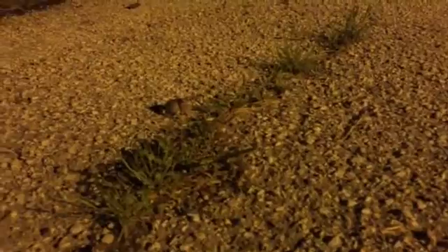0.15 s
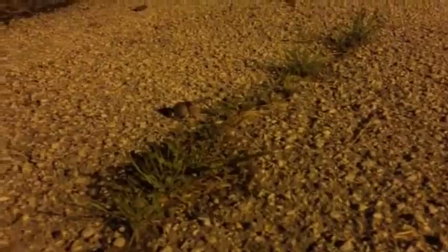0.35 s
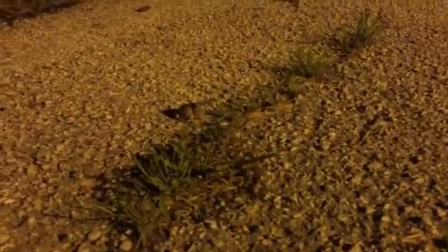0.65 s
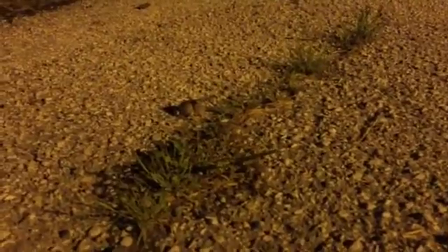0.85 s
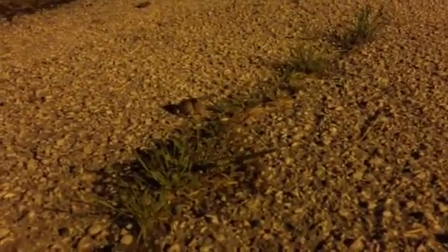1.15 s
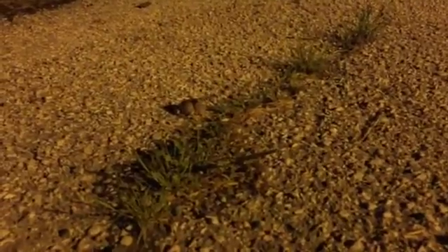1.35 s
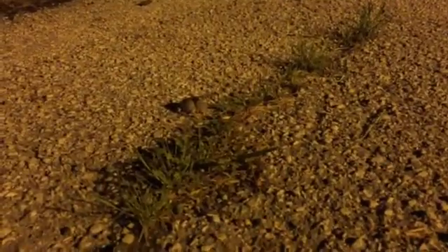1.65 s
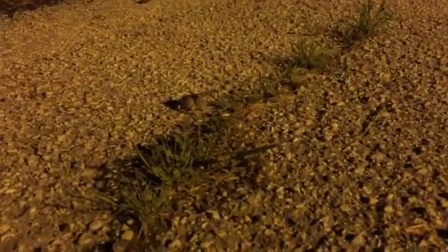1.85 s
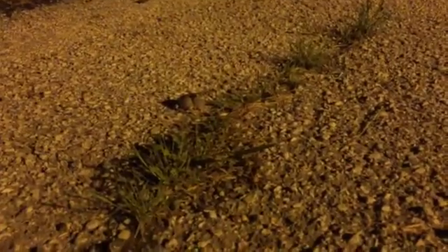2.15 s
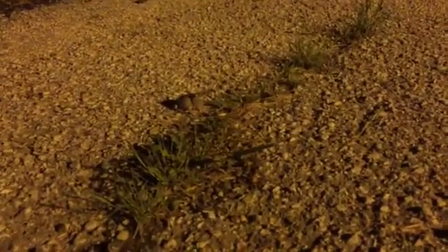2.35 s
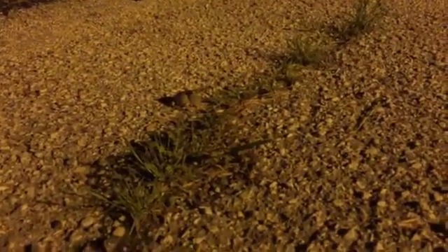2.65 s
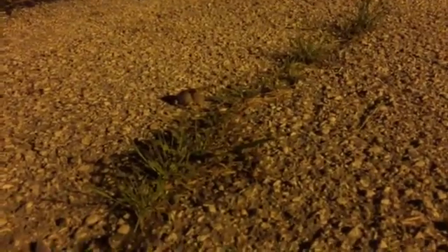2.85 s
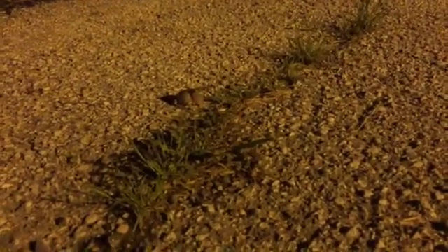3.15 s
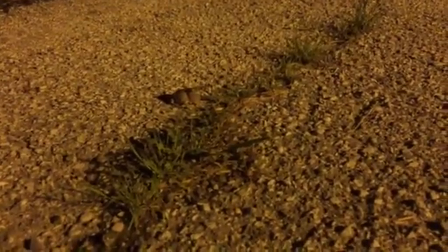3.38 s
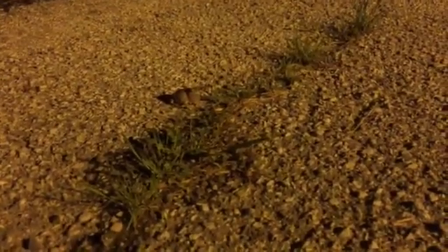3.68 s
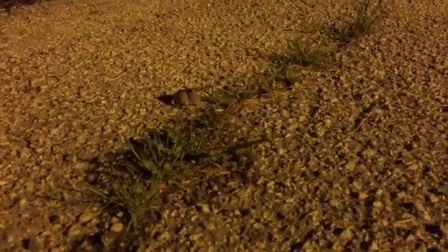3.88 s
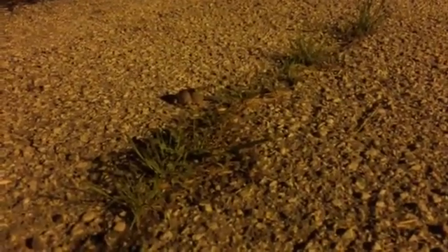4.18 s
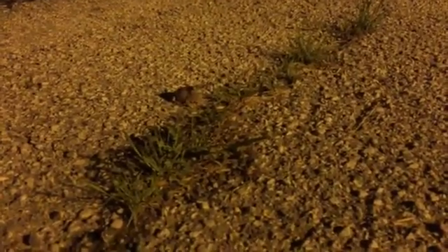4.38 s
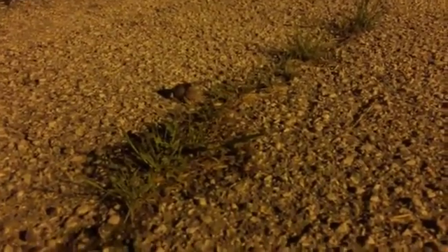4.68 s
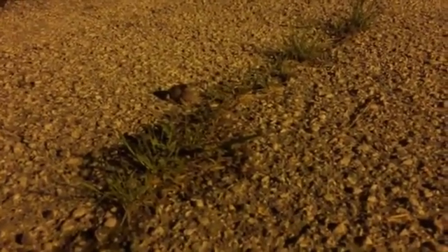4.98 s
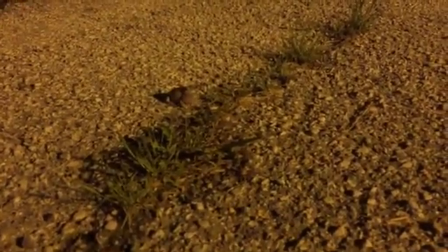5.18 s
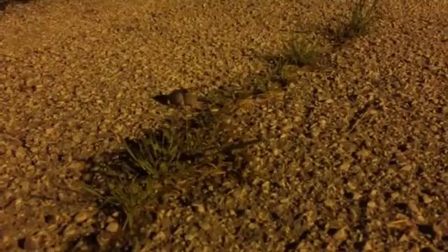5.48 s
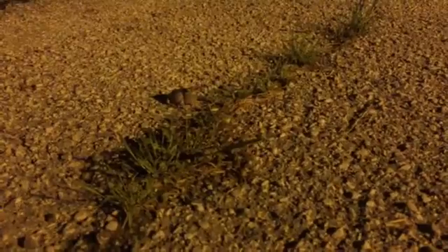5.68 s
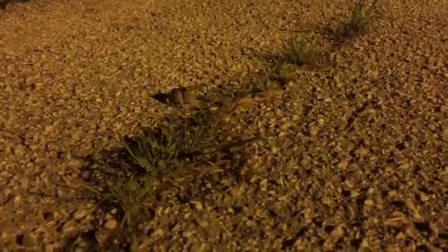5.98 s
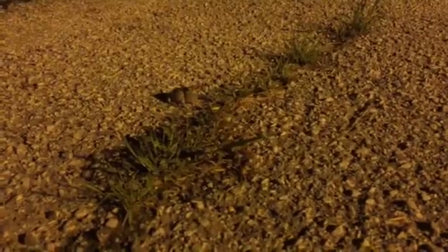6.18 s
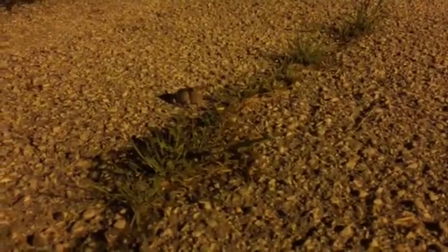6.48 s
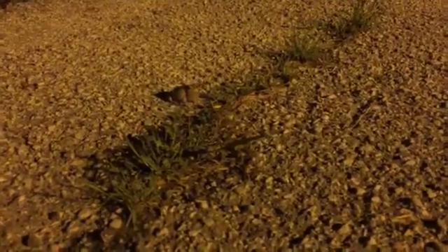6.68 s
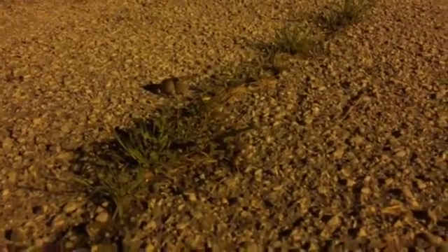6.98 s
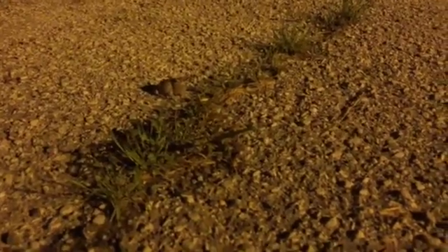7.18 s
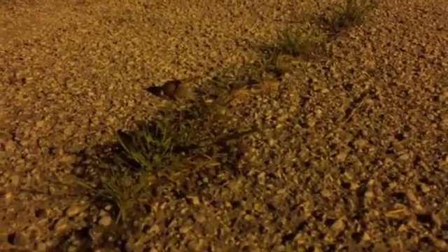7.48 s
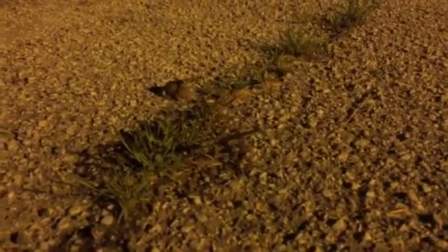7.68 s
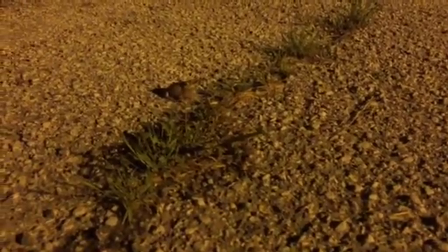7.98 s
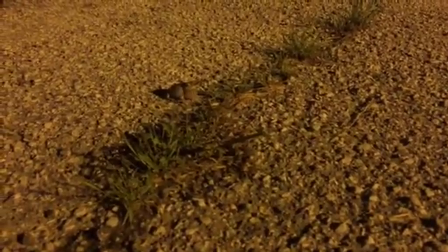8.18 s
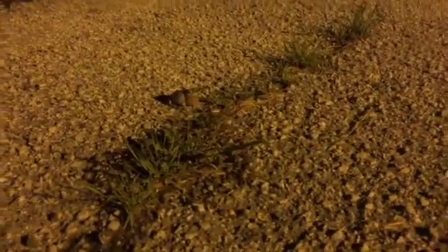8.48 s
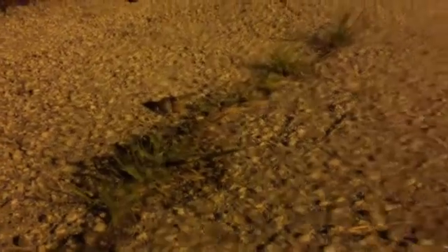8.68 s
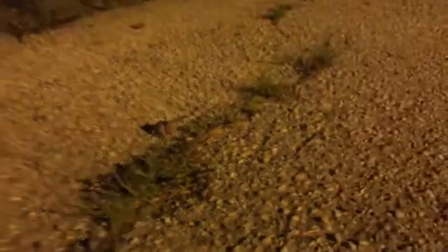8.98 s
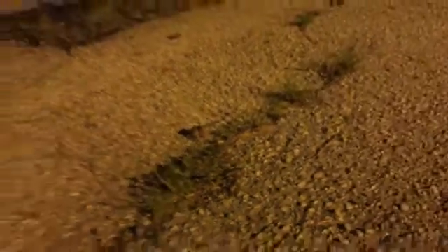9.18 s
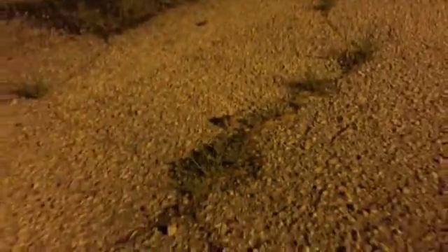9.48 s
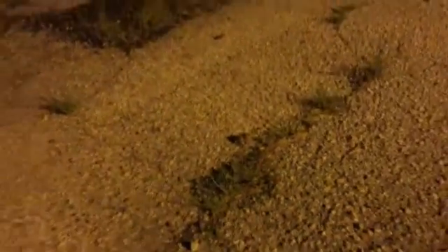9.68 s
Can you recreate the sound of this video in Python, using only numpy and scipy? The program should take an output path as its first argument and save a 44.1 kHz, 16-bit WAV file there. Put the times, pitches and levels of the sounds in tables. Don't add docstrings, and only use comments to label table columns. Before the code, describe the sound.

Quiet night lane with steady low hum, distant trilling frogs, a soft toad purr and small dry clicks. One frog very near the microphone winds up from hoarse, low pulses into a piercing train of upward whistles, pauses about two seconds, then repeats more briefly. Background ducks under each trill and creeps back. Faint truck and brake squeal between them; clicks thicken and a tiny tick comes near the end.

```python
import sys
import numpy as np
from scipy import signal
from scipy.fft import rfft, irfft, next_fast_len
from scipy.io import wavfile
from scipy.ndimage import uniform_filter1d

SR = 44100
rng = np.random.default_rng(int(sys.argv[2]) if len(sys.argv) > 2 else 0)


def amp(db):
    return 10 ** (np.asarray(db, float) / 20)


def write(x):
    x = np.atleast_2d(x).T
    wavfile.write(sys.argv[1], SR, np.round(np.clip(x, -1, 1) * 32767).astype(np.int16))


N = 433944
T = np.arange(N) / SR


def rms_one(x):
    return x / np.sqrt(np.mean(x ** 2) + 1e-20)


def in_time(rows):
    s, *columns = np.transpose(rows)
    return [np.interp(T, s, column) for column in columns]


def at_hz(points, hz):
    curve_hz, curve_db = np.transpose(points)
    return np.interp(np.log(hz), np.log(curve_hz), curve_db)


def band(x, low_hz, high_hz, order=2):
    return signal.sosfilt(signal.butter(order, [low_hz, high_hz], "band", fs=SR, output="sos"), x)


def noise_band(low_hz, high_hz, order=2):
    return rms_one(band(rng.standard_normal(N), low_hz, high_hz, order))


def drift(rate_hz):
    r = np.exp(-80 * np.pi * rate_hz / SR)
    slow = signal.lfilter([1], [1, -2 * r, r * r], rng.standard_normal(N // 40 + 1001))[1000:]
    return np.repeat(rms_one(slow - slow.mean()), 40)[:N]


def ring(x, hz, t60_s):
    r = amp(-60 / (t60_s * SR))
    gain = (1 - r * r) / 2
    return signal.lfilter([gain, 0, -gain], [1, -2 * r * np.cos(2 * np.pi * hz / SR), r * r], x + 1e-18)


def tone(hz, db):
    return np.sqrt(2) * amp(db) * np.sin(2 * np.pi * np.cumsum(hz) / SR)


def scatter(x, *tails):
    t = np.arange(SR // 2) / SR
    echoes = 0
    for db, t60_s, gap_s in tails:
        tail = rng.standard_normal(len(t)) * amp(-60 * t / t60_s) * (t > gap_s)
        echoes = echoes + amp(db) * tail / np.sqrt(np.sum(tail ** 2))
    return x + signal.fftconvolve(x, echoes)[:N]


# frequency in Hz, density in dB per Hz.
NIGHT_SPECTRUM = [(25, -39.5), (55, -12), (125, -9.5), (260, -13.5), (400, -15), (470, -20), (800, -21),
                  (1600, -27.5), (2600, -27.5), (2950, -40.5), (4200, -48.5), (7000, -54.5), (11000, -62),
                  (15500, -67.5)]


def night_air():
    size = next_fast_len(N)
    hz = np.maximum(np.fft.rfftfreq(size, 1 / SR), 1)
    rumble_cut = np.minimum(hz / 25, 1) ** 2
    air = irfft(rfft(rng.standard_normal(size)) * amp(at_hz(NIGHT_SPECTRUM, hz)) * rumble_cut, size)[:N]
    return amp(-42 + 0.31 * drift(2.2)) * rms_one(air)


# frequency in Hz, level in dB, wander in Hz.
DRONE_TONES = [(75.9, -41, 1), (152, -51, 2), (234.6, -48, 3.87), (295.4, -52, 6), (342.6, -48, 1.9),
               (351.5, -59.5, 2.24), (378, -50.5, 2.25), (415, -55.5, 1.86), (535, -66, 2.2),
               (669, -61.5, 1.83)]
# time in seconds, level change in dB.
LOW_DRONE_FADE = [
    (0, 0),
    (4.4, 0),
    (7, -2),
    (8.7, -6),
    (9.84, -7.5),
]
# time in seconds, pitch in Hz, level in dB.
FAR_ENGINE = [
    (0, 96.5, -44),
    (.6, 96.8, -37),
    (1.0, 96.2, -41.5),
    (2.0, 98.2, -54),
    (3.5, 94.7, -49),
    (4.5, 92.2, -66),
]
# time in seconds, pitch in Hz, level in dB.
PASSING_TRUCK = [
    (5.93, 181, -65),
    (5.99, 181.4, -35),
    (6.1, 169.6, -39.5),
    (6.17, 168.3, -34.5),
    (6.31, 159, -42.5),
    (6.4, 157.6, -43),
    (6.55, 156, -53),
    (6.62, 151.5, -65),
]
# time in seconds, pitch in Hz, level in dB.
BRAKE_SQUEAL = [
    (6.04, 8900, -100),
    (6.1, 8900, -82),
    (6.17, 8850, -76),
    (6.3, 9000, -86),
    (6.38, 9000, -100),
]


def machines():
    fade_db, = in_time(LOW_DRONE_FADE)
    out = np.zeros(N)
    for hz, db, wander_hz in DRONE_TONES:
        out += tone(hz + wander_hz * drift(8), db + 1.43 * drift(5.0) + fade_db * (hz < 100))
    for rows, wander_hz in ((FAR_ENGINE, 1.5), (PASSING_TRUCK, 1.2), (BRAKE_SQUEAL, 60)):
        hz, db = in_time(rows)
        present = (T > rows[0][0]) * (T < rows[-1][0])
        out += tone(hz + wander_hz * drift(18), db + 0.45 * drift(16)) * present
    return out


# milliseconds from closing, pitch in Hz, level in dB.
WHISTLE_SHAPE = [
    (-25, 890, -70),
    (-22, 935, -32),
    (-18, 1000, -20),
    (-13, 1070, -10),
    (-6, 1145, 0),
    (-2, 1212, -1),
    (.3, 1285, -9.5),
    (2.2, 1400, -27),
    (4, 1450, -70),
]
# frequency in Hz, gain in dB.
SAC_COLOUR = [(880, 8.5), (1080, -12), (1180, -15), (1290, -5), (1450, 2.5), (2600, 0), (3100, -34),
              (3700, -25), (4300, -50), (4800, -34.5), (5300, -58), (5900, -30), (6500, -38), (7000, -29),
              (8000, -47.5), (15500, -55)]


def whistles(close_s, peak_db, fundamental_db, length_ms, pitch, count):
    usual_ms, usual_fundamental_db = 12.21, -12
    balance_db = (fundamental_db - usual_fundamental_db)[:, None]
    k = np.arange(-1150, 170)
    stretch = np.where(k < 0, (usual_ms / length_ms[:, None]) ** 0.66, 1)
    ms = k / SR * 1000 * stretch
    shape_ms, shape_hz, shape_db = np.transpose(WHISTLE_SHAPE)
    hz = np.interp(ms, shape_ms, shape_hz) * pitch[:, None]
    db = np.interp(ms, shape_ms, shape_db, left=-120, right=-120)
    shake = signal.lfilter([.03], [1, -.97], rng.standard_normal(hz.shape))
    unsteady_hz = hz * (1 + .04 * shake)
    phase = 2 * np.pi * (np.cumsum(unsteady_hz, axis=1) / SR + rng.random((len(hz), 1)))
    wave = amp(db + at_hz(SAC_COLOUR, hz) + balance_db) * np.sin(phase)
    for n in range(2, count + 1):
        effort_db = 0
        if n > 2:
            effort_db = 2.0 + 0.32 * db + 0.15 * np.minimum(peak_db, 0)[:, None]
        if n == 3:
            effort_db = effort_db + 0.3 * balance_db
        wave += amp(db + effort_db + at_hz(SAC_COLOUR, n * hz)) * np.sin(n * phase)
    wave *= amp(peak_db)[:, None]
    at = np.clip(np.round(close_s * SR).astype(int)[:, None] + k, 0, N)
    return np.bincount(at.ravel(), wave.ravel(), minlength=N + 1)[:N]


# time in seconds, level in dB, centre pitch in Hz.
CHORUS_SWELL = [(0.1, -40.5, 2217), (0.45, -41.8, 2236), (1.0, -39.5, 2252), (1.45, -43, 2275),
                (2.15, -40.5, 2308), (2.7, -44, 2335), (3.0, -38, 2252), (3.4, -40.5, 2234),
                (3.65, -43, 2257), (4.0, -44.5, 2225), (4.2, -37.5, 2230), (5.6, -42, 2295),
                (6.6, -39.5, 2278), (7.2, -39, 2240), (8.2, -42.5, 2237), (8.65, -38.5, 2253),
                (9.2, -44.5, 2250), (9.7, -37, 2277)]


def chorus():
    db, centre_hz = in_time(CHORUS_SWELL)
    own = rng.random((8, 4))
    per_s = 21.5 + 6 * own[:, :1]
    close_s = np.arange(280) / per_s + .04 * own[:, 1:2] + .002 * rng.standard_normal((8, 280))
    calling = np.sin(2 * np.pi * (close_s / (2 + 1.5 * own[:, 2:3]) + own[:, 3:])) > -.1
    keep = calling & (close_s < T[-1])
    near_db = (-.9 * np.arange(8)[:, None] + 2.6 * rng.standard_normal((8, 280)))[keep]
    voices = 1 + np.linspace(-.07, .08, 8)[rng.permutation(8), None]
    own_pitch = (voices + 0 * close_s)[keep]
    close_s = close_s[keep]
    pitch = .98 * own_pitch * np.interp(close_s, T, centre_hz) / 2270
    calls = whistles(close_s, near_db, 0 * close_s - 9, 0 * close_s + 12.5, pitch, count=2)
    calls = band(scatter(calls, (-1, .3, .005)), 800, 2850, order=4)
    loudness = np.sqrt(uniform_filter1d(calls ** 2, size=SR // 4) + 1e-9)
    return amp(db) * calls / loudness


# start in seconds, peak level in dB.
NEAR_RATTLES = [(0.1131, -43), (0.2359, -44), (0.3925, -43), (0.609, -41), (0.8091, -41), (0.9173, -43),
                (1.0834, -44), (1.1288, -41), (4.3001, -47), (5.6876, -42), (5.8796, -44), (6.0777, -48),
                (6.4049, -41.5), (6.5476, -42), (6.6903, -45), (6.8095, -43), (7.0974, -42), (7.3428, -45),
                (8.4962, -42), (8.7057, -41.5), (8.8918, -40.5), (9.0923, -43), (9.2335, -41),
                (9.3991, -44), (9.4545, -40), (9.5138, -38), (9.6296, -41), (9.681, -36), (9.7323, -38),
                (9.8077, -37)]
# time in seconds, loudest level in dB.
OTHERS_LOUDEST = [(0, -41), (1.3, -50), (1.5, -65), (4.2, -54.5), (5.5, -44.5), (9.84, -36.5)]
LONE_CLICK_TIMES = [1.7235, 2.0388, 2.2518, 2.4818, 2.6738, 2.8574, 3.0076, 3.1428, 3.26, 3.5039, 3.7559,
                    3.9529, 4.1525]


def cricket_frogs():
    others_gap_s, others_spread_db = .135, 7.5
    s, db = np.transpose(NEAR_RATTLES)
    others = rng.random((int(T[-1] / others_gap_s), 2))
    others_s = (np.arange(len(others)) + 0.61 * others[:, 0]) * others_gap_s
    others_db = np.interp(others_s, *np.transpose(OTHERS_LOUDEST)) - others_spread_db * others[:, 1]
    s = np.append(s, others_s)
    db = np.append(db, others_db)
    draw = rng.random((len(s), 3, 8))
    click_s = s[:, None] + np.cumsum(0.0035 + 0.0087 * draw[:, 0], axis=1) - .003
    size = amp(db[:, None] + 35.5 - 2.2 * np.arange(8) - 4.6 * draw[:, 1])
    at = np.minimum((click_s * SR).astype(int), N - 1)
    throat = (draw[:, 2, 0] * 3).astype(int)
    near = np.zeros(N)
    for n, throat_hz in enumerate((3300, 3470, 3600)):
        clicks = np.zeros(N)
        clicks[at[throat == n]] = size[throat == n]
        near += ring(clicks, throat_hz, t60_s=.011)
    lone_s = (np.array(LONE_CLICK_TIMES)[:, None] + [0, 0.0038]).ravel()
    lone_size = amp(-10 + 2 * rng.standard_normal(len(lone_s)))
    lone = np.bincount((lone_s * SR).astype(int), lone_size, minlength=N)
    near += ring(lone, 3330, t60_s=.02)
    far = amp(-63.5 + 2.8 * drift(22)) * noise_band(3090, 3710, order=3)
    return band(scatter(near, (-5, .12, .003)), 3150, 3780, order=4) + far


# time in seconds, throat pitch in Hz, pulses per second, level in dB.
TOAD_TRILL = [
    (1.78, 1600, 52, -88),
    (1.9, 1690, 56, -54),
    (2.1, 1788, 39, -52.5),
    (3.2, 1794, 50, -53),
    (4.3, 1786, 47.5, -52.5),
    (5.8, 1774, 47.5, -54),
    (6.0, 1720, 59, -64),
    (6.1, 1800, 47, -80),
]


def toad():
    hz, per_s, db = in_time(TOAD_TRILL)
    turn = 2 * np.pi * np.cumsum(per_s) / SR
    beat = np.maximum(0.29 + 0.43 * np.cos(turn) + 0.25 * np.cos(2 * turn), 0)
    call = beat * tone(hz * (1 + 0.011 * drift(30)), db + 9.5 + 0.92 * drift(13))
    return scatter(call, (-3, .3, .01))


# last closing in seconds, length in seconds, pulses per second,
# pitch as a ratio to the main frog, peak level in dB.
NEIGHBOUR_TRILLS = [
    (0.33, .33, 23.5, 0.93, -38),
    (1.324, .42, 23.2, 0.97, -37.5),
    (3.494, .52, 23, 0.99, -35),
    (8.899, .5, 27, 1, -38),
    (9.621, .3, 24, 0.98, -37),
]


def neighbours():
    back = np.arange(16)
    last_s, length_s, per_s, pitch, db = np.transpose(NEIGHBOUR_TRILLS)[:, :, None]
    keep = back / per_s < length_s
    close_s = (last_s - back / per_s)[keep]
    level_db = (db + 2.1 * rng.standard_normal(keep.shape))[keep]
    own_pitch = (pitch + 0 * back)[keep]
    calls = whistles(close_s, level_db, 0 * close_s - 8, 0 * close_s + 12.56, own_pitch, count=2)
    return band(scatter(calls, (-4, .2, .004)), 800, 2800, order=4)


# centre in seconds, length in seconds, centre pitch in Hz, level in dB.
RUSTLE_PUFFS = [
    (3.397, 0.036, 7480, -63.5),
    (3.48, .015, 6000, -69),
    (6.195, .004, 5000, -63),
    (8.693, 0.0028, 9300, -52),
    (8.71, .03, 9000, -73),
    (9.695, 0.24, 7900, -73),
]


def rustles():
    out = np.zeros(N)
    for s, length_s, hz, db in RUSTLE_PUFFS:
        span = slice(int((s - .6) * SR), min(int((s + .6) * SR), N))
        grains = rng.standard_normal(N)[span] * amp(4 * drift(150)[span])
        puff = np.exp(-((T[span] - s) / length_s) ** 2)
        out[span] += amp(db) * puff * rms_one(band(grains, hz * 0.58, hz * 1.2))
    return out


FIRST_CLOSINGS = [4.3623, 4.398, 4.4363, 4.4739, 4.5118, 4.553, 4.5931, 4.632, 4.6727, 4.7144, 4.7534,
                  4.7941, 4.8349, 4.8767, 4.9187, 4.9591, 5.001, 5.0413, 5.0829, 5.1242, 5.1644, 5.2102]
SECOND_CLOSINGS = [7.3885, 7.4268, 7.463, 7.4994, 7.5356, 7.5746, 7.613, 7.6498, 7.6897, 7.7286, 7.7681,
                   7.807, 7.8467, 7.8889, 7.9314, 7.9747]
# full peak in dB before gain control, how much weaker the first pulse is in dB,
# wind-up in seconds.
TRILL_WIND_UP = [
    (8.4, 31, .27),
    (8.5, 26, 0.179),
]


def trill_pulses():
    settle_db, settle_s = 3.5, .45
    rows = []
    for closings, (full_db, first_db, wind_s) in zip((FIRST_CLOSINGS, SECOND_CLOSINGS), TRILL_WIND_UP):
        since_s = np.array(closings) - closings[0]
        short_db = first_db * np.maximum(1 - since_s / wind_s, 0) ** 2
        short_db += settle_db * np.maximum(1 - since_s / settle_s, 0)
        fundamental_db = np.minimum(-11.5 + 0.44 * short_db, -0.5)
        length_ms = np.maximum(12.22 - 1.1 * short_db, 6.1)
        rows.append([closings, full_db - short_db, fundamental_db, length_ms])
    return np.hstack(rows)


# seconds from its first pulse, level in dB.
HOARSENESS = [
    (-.07, 12.5),
    (.075, 18.5),
    (.185, 11),
    (.285, 6.5),
    (.43, -1.5),
    (.9, 4.5),
]
# frequency in Hz, level in dB, t60 in seconds.
SAC_RESONANCE = (1385, -1, .013)


def tree_frog():
    close_s, peak_db, fundamental_db, length_ms = trill_pulses()
    pitch = 1 + .0035 * np.minimum(peak_db, 0) + 0.0053 * rng.standard_normal(len(close_s))
    call = whistles(close_s, peak_db + 0.94, fundamental_db, length_ms, pitch, count=13)
    between_s = (FIRST_CLOSINGS[-1] + SECOND_CLOSINGS[0]) / 2
    since_s = T - np.where(T < between_s, FIRST_CLOSINGS[0], SECOND_CLOSINGS[0])
    hoarse_db = np.interp(since_s, *np.transpose(HOARSENESS))
    rasp = amp(-38 + hoarse_db) * band(call * noise_band(200, 1500), 1500, 4500)
    rasp += amp(-73 + hoarse_db) * call * noise_band(2900, 12000)
    power = uniform_filter1d(uniform_filter1d(call ** 2, size=800), size=600)
    swell = np.sqrt(np.maximum(power, 0))
    breath = noise_band(1570, 2880, order=3) + amp(-23.5) * noise_band(3000, 8500)
    leak = amp(-28 + .75 * hoarse_db) * swell * breath
    ring_hz, ring_db, ring_t60_s = SAC_RESONANCE
    sac = amp(ring_db) * ring(ring(call, ring_hz, ring_t60_s), ring_hz, ring_t60_s)
    closings = np.bincount((close_s * SR).astype(int), amp(peak_db - 49), minlength=N)
    puff_t60_s = .022
    puff = signal.lfilter([1], [1, -amp(-60 / (puff_t60_s * SR))], closings)
    puff = puff * noise_band(3100, 11000, order=1)
    near = band(call + rasp + sac + puff, 830, 17000, order=4)
    echoes = scatter(near, (-26, .09, .003), (-36, .4, .02)) - near
    return near + band(echoes, 700, 4500, order=1) + leak


def scene():
    background = night_air() + machines() + chorus() + cricket_frogs() + toad()
    return (background + neighbours() + rustles() + tree_frog())[None]


def low_pass(x):
    return signal.sosfilt(signal.butter(12, 15880, fs=SR, output="sos"), x)


def record(dry):
    start_db, share, attack_s, recovery_db_s = -4.5, 0.93, 0.084, 25.5
    over_db = np.maximum(20 * np.log10(np.abs(dry[0]) + 1e-9) - start_db, 0) * share
    held_db = np.maximum.accumulate(over_db + recovery_db_s * T) - recovery_db_s * T
    r = np.exp(-1 / (attack_s * SR))
    x = dry * amp(-signal.lfilter([1 - r], [1, -r], held_db))
    x = x + 0.014 * band(x ** 2, 11.0, 400, order=1)
    overload = .69
    x = x / (1 + np.abs(x / overload) ** 8) ** (1 / 8)
    x = signal.sosfilt(signal.cheby2(10, 60, 16500, fs=SR, output="sos"), x)
    return low_pass(x)


dry = scene()
out = record(dry)
write(out)
```